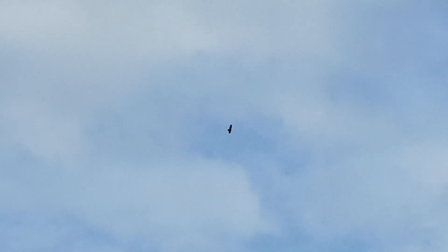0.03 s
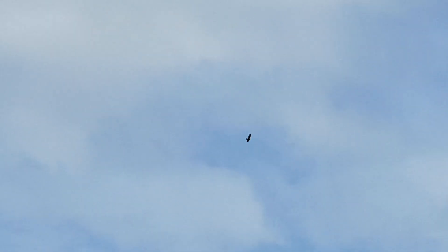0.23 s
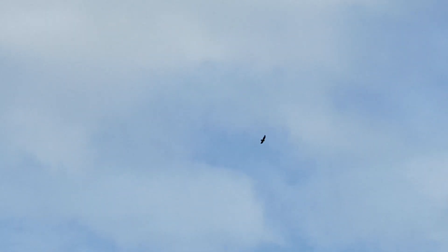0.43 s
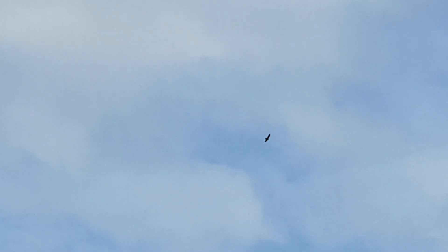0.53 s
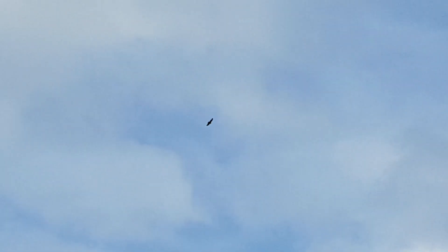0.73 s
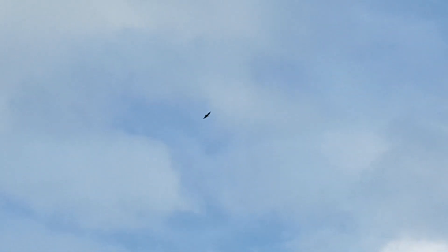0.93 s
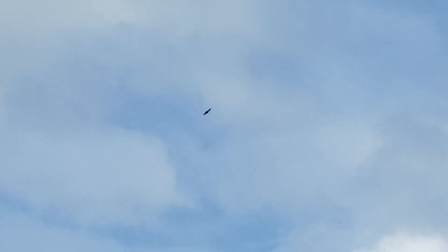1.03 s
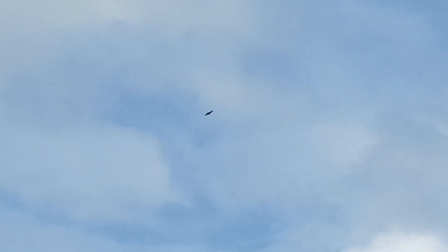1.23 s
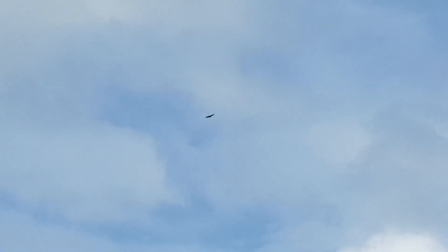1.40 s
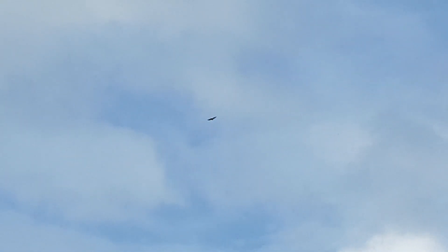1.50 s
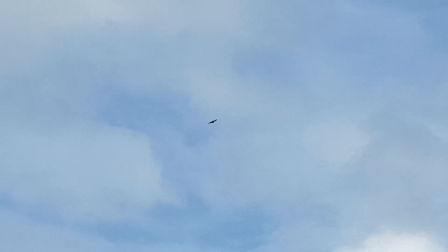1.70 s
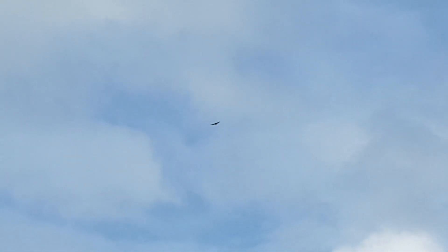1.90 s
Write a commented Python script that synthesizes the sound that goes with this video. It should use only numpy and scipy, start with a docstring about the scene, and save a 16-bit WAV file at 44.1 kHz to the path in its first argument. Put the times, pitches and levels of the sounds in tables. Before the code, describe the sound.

A soaring bird of prey gives one thin, wavering mewing whistle far overhead in breezy open air

```python
"""A distant wash of air over the countryside runs throughout, with wind puffing on the ports, mostly the
left; early on a finger scrapes and clicks twice on the camera's plastic case, close to the left microphone.
Far overhead a soaring bird of prey gives one mewing whistle that wavers through moving air.
Wash, rumble and hiss are coloured noise; puffs are short low waves; the clicks are decaying modes
and noise; the whistle is four partials on one gliding pitch, with a little scatter behind it."""
import sys
import numpy as np
from scipy import signal
from scipy.fft import rfft, irfft, next_fast_len
from scipy.io import wavfile
from scipy.ndimage import map_coordinates

SR = 44100
rng = np.random.default_rng(int(sys.argv[2]) if len(sys.argv) > 2 else 0)


def bounce(signal):
    """Save signal as a 16-bit WAV file at the path given by the first command-line argument."""
    frames = np.transpose(np.atleast_2d(signal))
    limited = np.clip(frames, -1, 1)
    pcm = np.round(limited * 32767).astype(np.int16)
    wavfile.write(sys.argv[1], SR, pcm)


N = 85995  # length [samples]


def amp(db):
    """Amplitude ratio of a level in dB."""
    return 10 ** (np.asarray(db) / 20)


def unit(x):
    """x brought to rms 1."""
    return x / np.sqrt(np.mean(x ** 2) + 1e-20)


def along(points, hz):
    """Values at hz, read between (frequency [Hz], value) points on a log axis."""
    f, v = np.transpose(points)
    return np.interp(np.log(hz + 1), np.log(f + 1), v)


def curves(rows):
    """One value per sample for each column after the time."""
    s, *columns = np.transpose(rows)
    t = np.arange(N) / SR
    return [np.interp(t, s, column) for column in columns]


def wobble(rate):
    """A smooth random curve with rate knots a second."""
    knots = rng.standard_normal(int(N * rate / SR) + 4)
    return map_coordinates(knots, [np.arange(N) * rate / SR])


def filtered(x, response):
    """x shaped by a response of frequency, padded so that its end does not wrap to the start."""
    m = next_fast_len(x.shape[-1] + 8192)
    spectrum = rfft(x, m) * response(np.fft.rfftfreq(m, 1 / SR))
    return irfft(spectrum, m)[..., :x.shape[-1]]


def rush(colour, likeness):
    """Stereo noise of rms 1; the share of mid and side sets the left-right correlation by frequency."""
    def mid_side_response(hz):
        turn = np.arccos(np.clip(along(likeness, hz), -1, 1)) / 2
        return amp(along(colour, hz)) * [np.cos(turn), np.sin(turn)]

    mid, side = filtered(rng.standard_normal((2, N)), mid_side_response)
    return unit(np.array([mid + side, mid - side]))


def sides(pan_db):
    """Left and right gains for a left-over-right difference in dB."""
    return amp([pan_db / 2, -pan_db / 2])


def wash():
    """Far air in trees and fields: broad noise, partly alike at both ports, with a gently restless level."""
    # slow level of the distance, before the gain below: (time [s], level [dB])
    level = [(0.0, -65.5), (0.184, -65.5), (0.412, -63), (0.792, -65), (1.222, -65), (1.83, -64),
             (1.95, -64.5)]
    # colour of the far air: (frequency [Hz], relative density [dB per Hz])
    colour = [(59, -57), (100, -34), (198, -10), (236, -9), (266, -7), (436, -5.5), (492, -7.5),
              (808, -2.5), (1240, -3.5), (1500, -8.5), (6000, -29.5), (7800, -73), (13200, -120)]
    # how alike the two ports hear it: (frequency [Hz], left-right correlation [-1 to 1])
    likeness = [(60, -0.05), (130, 0.12), (290, 0.58), (640, 0.72), (1410, 0.052), (3100, 0.11),
                (6820, -0.46), (15000, -0.0)]
    gain_db, restless_db, restless_per_s = 3.5, 0.58, 12.08
    level_db, = curves(level)
    return amp(level_db + gain_db + restless_db * wobble(restless_per_s)) * rush(colour, likeness)


def wind():
    """Turbulence at the ports: short low puffs, each on one port, over a lumpy, nearly unrelated rumble."""
    # puffs: (centre time [s], frequency [Hz], envelope peak [dB],
    # port [rounded: 0 left, 1 right, -2 also left])
    puffs = [(0.013, 121, -60, -1.5), (.19, 150, -57.5, 0), (0.3, 91, -58, 1), (.351, 50.3, -62, 0),
             (0.399, 70, -55.5, 0), (.44, 51, -56, 0), (0.446, 183, -50.5, 0), (.506, 63, -53, 0),
             (0.514, 161, -50, 0), (0.523, 92, -58.5, 1), (0.549, 92, -55.5, 0), (0.686, 194, -55.5, 0),
             (0.778, 203, -49, 0), (0.815, 190, -55, 0), (.844, 280, -50, 0), (.846, 108, -50.5, 0),
             (0.885, 183, -49, 0), (0.924, 209, -53.5, 0), (0.933, 104, -53.5, 0), (.995, 75, -60.5, 0),
             (1.009, 160, -58, 0), (1.047, 80, -61, 0), (1.062, 60, -59, 1), (1.135, 63, -53.5, 0),
             (1.138, 202, -51, 0), (1.2, 59.4, -63, 0), (1.283, 69.1, -59, 0), (1.33, 80.25, -64, 0),
             (1.459, 60, -63, 1), (1.492, 64.6, -58, 0), (1.551, 91.1, -56.5, 0), (1.63, 60, -66, 0),
             (1.695, 70, -67, 0)]
    # colour of the rumble: (frequency [Hz], relative density [dB per Hz])
    colour = [(15, -12), (30, 1.5), (70, 1), (150, -3.5), (280, -9.5), (450, -36), (900, -120)]
    # rumble level before the left port's swell: left [dB], right [dB]
    rumble_db = -71.5, -76
    # swell of the rumble at the left port alone: (time [s], gain [dB])
    left_swell = [(0, -3.5), (.25, -3), (.33, 6), (.56, 7), (.6, -1), (.72, -2), (.78, 7), (.95, 3),
                  (1.2, 3.5), (1.4, -1), (1.55, 0.5), (1.95, -4.5)]
    lumps_db, lumps_per_s = 0.5, 30
    puff_cycles = 1.14  # from a puff's centre to 1/e of its peak
    t = np.arange(N) / SR
    lumps = amp(lumps_db * np.array([wobble(lumps_per_s), wobble(lumps_per_s)]))
    rumble = unit(lumps * rush(colour, [(50, 0.023)]))
    out = amp(rumble_db)[:, None] * rumble
    out[0] *= amp(*curves(left_swell))
    for s, hz, peak_db, port in puffs:
        turns = hz * (t - s)
        envelope = amp(peak_db) * np.exp(-(turns / puff_cycles) ** 2)
        out[round(port)] += envelope * np.cos(2 * np.pi * (turns + rng.random()))
    return out


def ringing(modes, attack_s, t):
    """Decaying sine modes at both ports with a soft onset."""
    total = sum(amp([[left], [right]]) * amp(-60 * t / t60) * np.sin(2 * np.pi * hz * t)
                for hz, left, right, t60 in modes)
    return (1 - np.exp(-t / attack_s)) * total


def clicks():
    """Each contact cracks and rings the shell, later and duller at the far port, and thuds in the body."""
    # contacts on the case, before its low cut: (time [s], shell [dB], crack [dB], body [dB], thud [dB])
    contacts = [(.1968, -44, -45, -55, -69), (.204, -47, -48, -55, -58), (0.2118, -44, -38, -52, -56),
                (0.215, -34, -44, -53, -61), (.222, -25.5, -16.5, -30, -26.5), (0.235, -45, -50, -62, -49),
                (.2392, -49, -54, -38.5, -52), (0.2463, -49, -44, -61, -63), (0.2531, -47, -42, -61, -51),
                (0.2534, -26, -29, -59, -60), (0.2625, -8, -12, -21, -29), (.2647, -21, -28.5, -16, -32)]
    # modes of the plastic shell: (frequency [Hz], left port [dB], right port [dB], 60 dB decay [s])
    shell_modes = [(1610, -0.5, -6.5, 0.0086), (2040, -4.5, -11, 0.0068), (3180, -5.5, -15, 0.0065),
                   (3670, -10, -21, 0.0068), (4340, -13.5, -31, 0.0051)]
    # body mode under it, at both ports at once: (frequency [Hz], left [dB], right [dB], 60 dB decay [s])
    body_modes = [(1036, 0, 1.5, 0.01)]
    # low modes of the body in the hand: (frequency [Hz], left [dB], right [dB], 60 dB decay [s])
    grip_modes = [(273, -6.5, -7, .02), (500, 0.5, -1, .014)]
    # colour of the crack: (frequency [Hz], relative density [dB per Hz])
    crack_colour = [(1500, 10), (4000, -4.5), (9000, -6), (13000, -4), (16000, -15)]
    crack_t60_s, crack_right_db = 0.0027, -17
    right_lag_s = 0.0006  # shell and crack reach the right port later
    shell_attack_s, body_attack_s = 0.00017, 0.0013
    case_low_hz = 204  # the case carries little below this

    out = np.zeros((2, N))
    t = np.arange(SR // 20) / SR
    shell = ringing(shell_modes, shell_attack_s, t)
    knock = ringing(body_modes, body_attack_s, t)
    thud = ringing(grip_modes, body_attack_s, t)
    crack_fall = amp(-60 * t / crack_t60_s)
    for s, shell_db, crack_db, knock_db, thud_db in contacts:
        noise = unit(filtered(rng.standard_normal((2, len(t))), lambda hz: amp(along(crack_colour, hz))))
        crack = amp([[crack_db], [crack_db + crack_right_db]]) * crack_fall * noise
        hit = amp(shell_db) * shell + crack
        for port, lag in enumerate([0, right_lag_s]):
            out[port, round((s + lag) * SR):][:len(t)] += hit[port]
        out[:, round(s * SR):][:, :len(t)] += amp(knock_db) * knock + amp(thud_db) * thud
    return filtered(out, lambda hz: (1j * hz / (case_low_hz + 1j * hz)) ** 2)


def scrape():
    """The finger's grainy rub on the case: noise that swells up to a stronger contact and stops dead."""
    # scrapes: (end time [s], level at the end [dB], rise time constant [s])
    scrapes = [(0.2164, -48.5, .004), (.2221, -43, 0.0028), (0.254, -47, 0.0046), (0.2622, -40, 0.0046)]
    # colour of the rub: (frequency [Hz], relative density [dB per Hz])
    colour = [(300, 0.5), (1500, 2.5), (4000, -8), (9000, -17), (16000, -11)]
    right_db, grain_db, grains_per_s = -14, 2.7, 900
    t = np.arange(N) / SR
    swell = sum(amp(db) * np.exp(np.minimum(t - s, 0) / rise) * (t < s) for s, db, rise in scrapes)
    grain = amp(grain_db * wobble(grains_per_s))
    return swell * grain * amp([[0], [right_db]]) * rush(colour, [(50, 0.56)])


def bird():
    """Four partials on one pitch, each fading on its own at each port in the air, then a little scatter."""
    # the whistle's fundamental, before its waver: (time [s], frequency [Hz])
    pitch = [(.975, 992), (.993, 1160), (1.011, 1237), (1.03, 1293), (1.055, 1331), (1.14, 1301),
             (1.25, 1276), (1.37, 1277), (1.485, 1246), (1.601, 1226), (1.675, 1186), (1.709, 1142),
             (1.729, 1080), (1.743, 1010)]
    # first partial, before fading: (time [s], level [dB])
    first = [(.975, -93), (1.02, -82), (1.045, -67), (1.09, -65), (1.17, -68), (1.22, -70.5), (1.3, -69.5),
             (1.34, -65), (1.39, -71), (1.45, -70), (1.52, -76), (1.742, -79)]
    # second and strongest partial; its pan serves all four: (time [s], level [dB], left over right [dB])
    second = [(.975, -80, -6), (.993, -59.5, -4), (1.003, -57.5, -6), (1.018, -73, 7), (1.04, -64, -2.5),
              (1.06, -65, -9.5), (1.1, -66.5, -10), (1.14, -68, -7), (1.18, -69.5, -1), (1.21, -70, 7),
              (1.25, -72.5, -4), (1.309, -63.5, -6), (1.337, -72, -8), (1.369, -80, 3), (1.397, -79, 2),
              (1.412, -67, 3), (1.433, -82, -2), (1.447, -66.5, -5), (1.475, -71, 1), (1.49, -63, -12),
              (1.525, -67.5, 8), (1.55, -70.5, 5), (1.597, -77, 0), (1.615, -65.5, -13), (1.635, -68, -16),
              (1.655, -73, -9), (1.673, -61.5, -4), (1.695, -74, -2), (1.71, -62.5, -5), (1.725, -65, -4),
              (1.742, -80, -4)]
    # third partial, before fading: (time [s], level [dB])
    third = [(.975, -98), (.992, -81), (1.003, -72), (1.014, -83), (1.045, -75), (1.15, -84.5), (1.19, -90),
             (1.24, -85), (1.37, -85), (1.4, -99), (1.44, -87), (1.485, -80), (1.52, -86), (1.55, -74),
             (1.605, -73), (1.622, -93), (1.655, -90), (1.675, -79), (1.7, -80), (1.712, -87), (1.73, -77),
             (1.742, -90)]
    # fourth partial, before fading: (time [s], level [dB])
    fourth = [(.975, -105), (1.08, -98), (1.12, -92), (1.2, -90), (1.3, -89), (1.43, -91), (1.5, -102),
              (1.742, -105)]
    fading_db, waver_hz, edge_s = 2, 5, 0.0056  # fading in the air; pitch waver; start and end ramps
    echo_db, echo_t60_s = -13.5, 0.22  # scattering from ground and trees

    t = np.arange(N) / SR
    hz, = curves(pitch)
    second_db, pan_db = curves(second)
    phase = 2 * np.pi * np.cumsum(hz + waver_hz * wobble(60)) / SR
    start_s, end_s = pitch[0][0], pitch[-1][0]
    gate = np.clip(np.minimum(t - start_s, end_s - t) / edge_s, 0, 1)

    partials = np.zeros((2, N))
    levels = [*curves(first), second_db, *curves(third), *curves(fourth)]
    for number, level_db in enumerate(levels, start=1):
        fading = fading_db * np.array([wobble(60.1), wobble(60)])
        partials += amp(level_db + fading) * np.sin(number * phase)
    call = np.sqrt(2) * gate * sides(pan_db) * partials  # root 2: the levels are rms

    tail = rng.standard_normal((2, SR // 4)) * amp(-60 * t[:SR // 4] / echo_t60_s)
    tail /= np.linalg.norm(tail[0])
    scatter = signal.fftconvolve(call, tail, axes=1)[:, :N]
    return call + amp(echo_db) * scatter


def scene():
    """Everything that reaches the two microphone ports."""
    return wash() + wind() + clicks() + scrape() + bird()


def record(dry):
    """Hiss that ends near 15.9 kHz and a small offset are added; nothing sounds above top_hz."""
    # colour of the hiss: (frequency [Hz], relative density [dB per Hz])
    hiss_colour = [(2500, -35), (4000, -11), (6100, -4), (8000, -4.5), (12000, -3), (15700, 1.5),
                   (15900, -50), (16000, -120)]
    hiss_db, top_hz = -77, 16690
    offset = -0.0005  # of the converter, full scale 1
    hiss = amp(hiss_db) * rush(hiss_colour, [(50, 0)])
    return filtered(dry + hiss, lambda hz: hz < top_hz) + offset


dry = scene()
out = record(dry)
bounce(out)
```